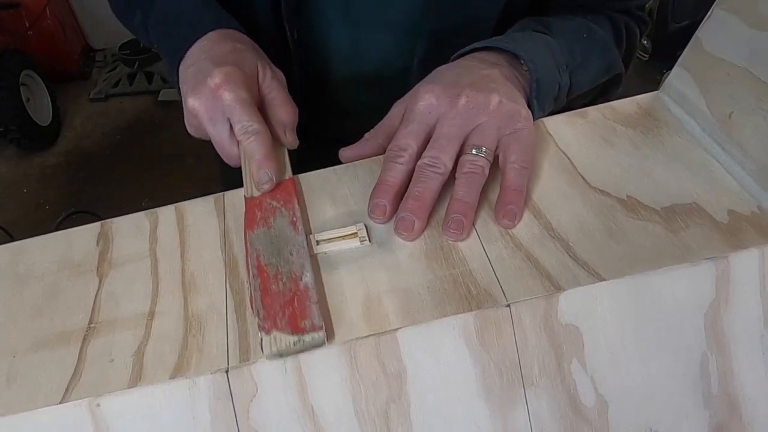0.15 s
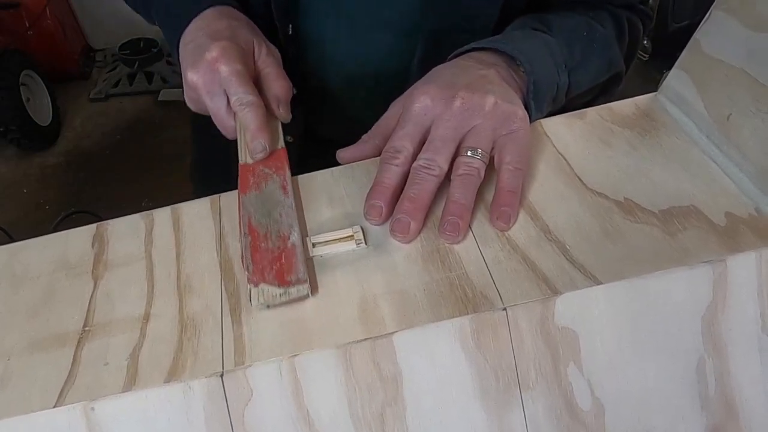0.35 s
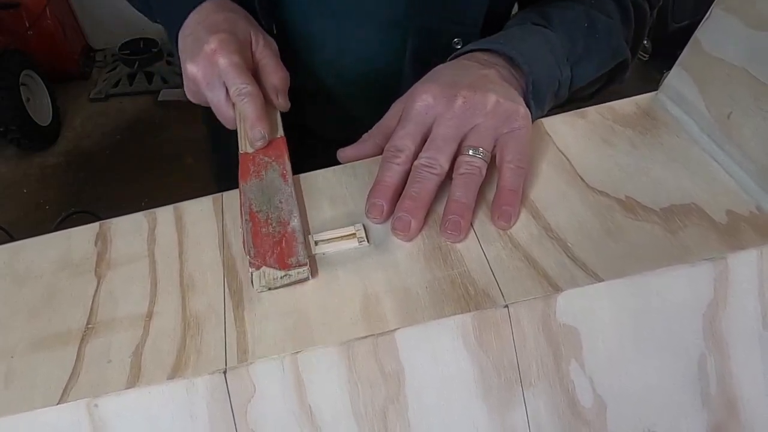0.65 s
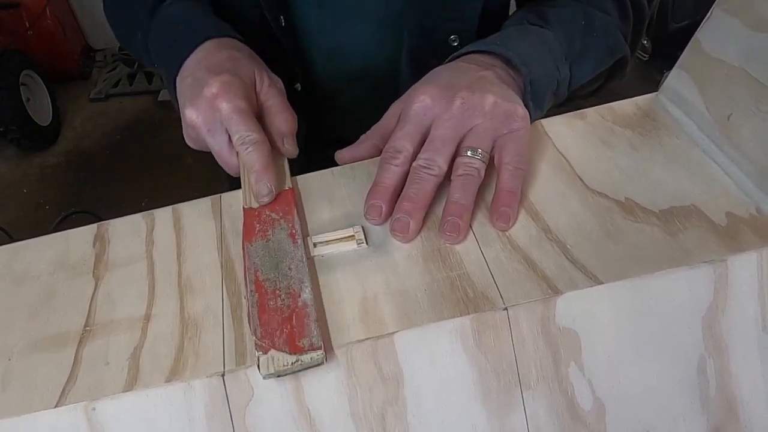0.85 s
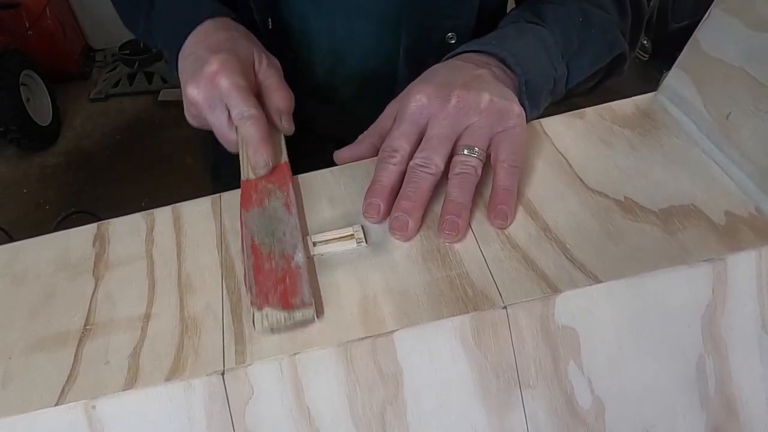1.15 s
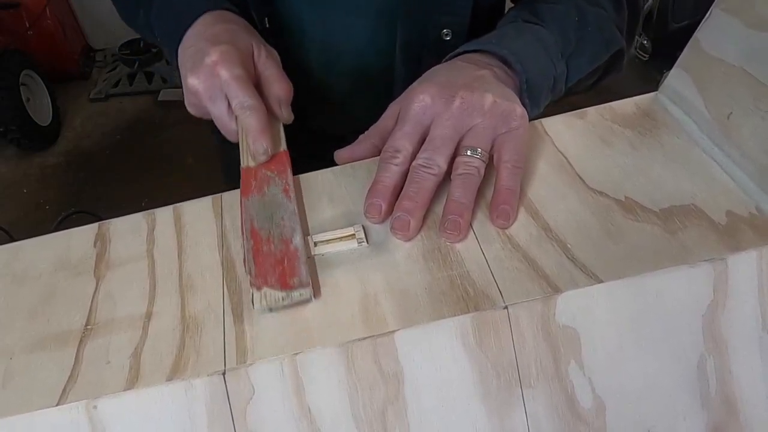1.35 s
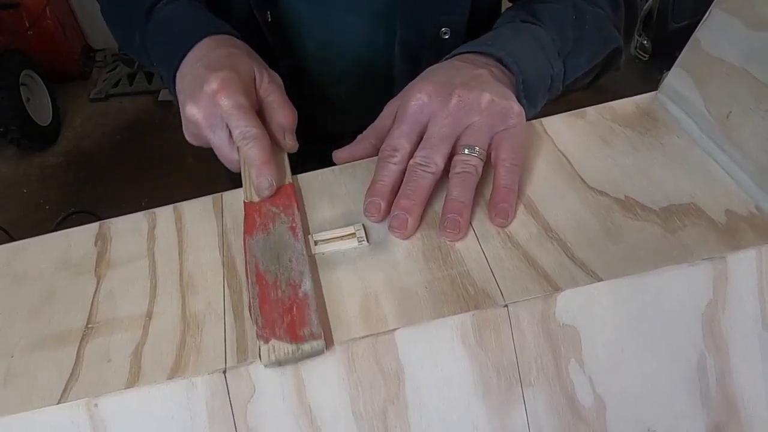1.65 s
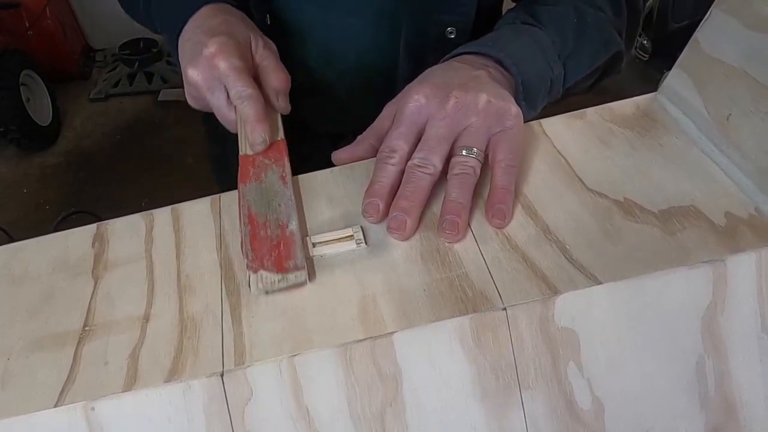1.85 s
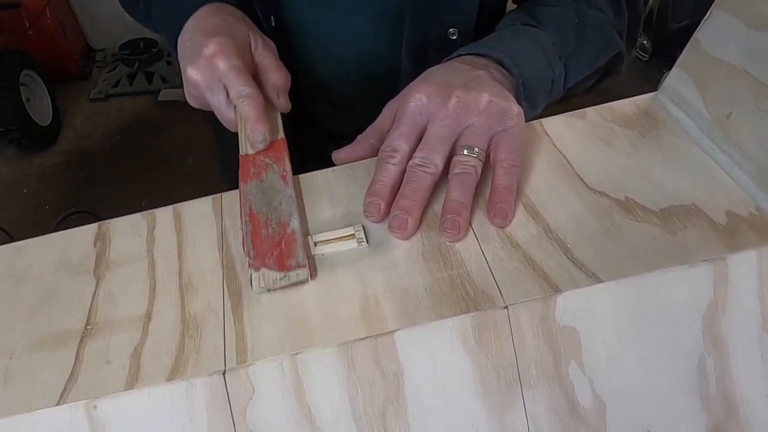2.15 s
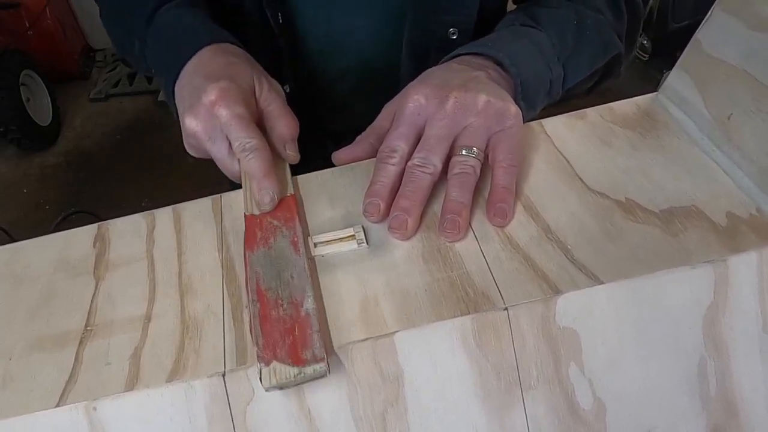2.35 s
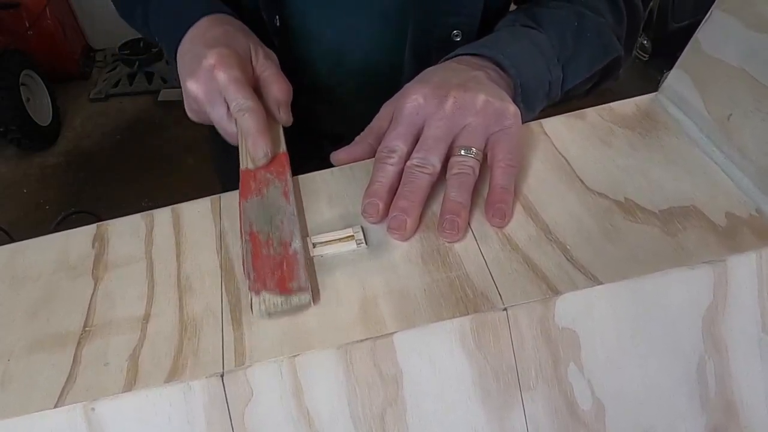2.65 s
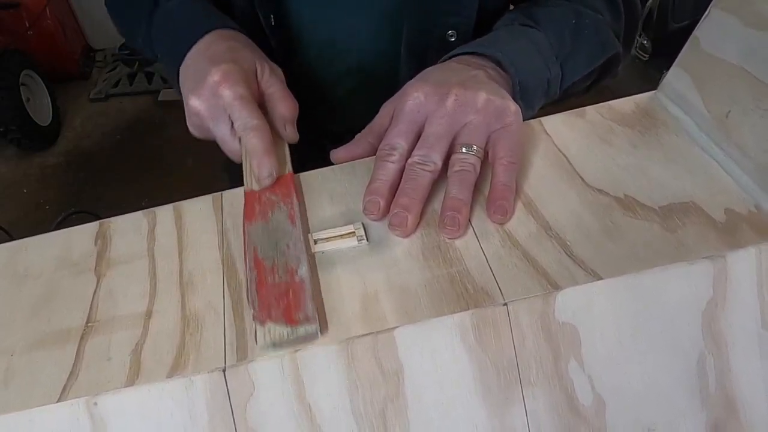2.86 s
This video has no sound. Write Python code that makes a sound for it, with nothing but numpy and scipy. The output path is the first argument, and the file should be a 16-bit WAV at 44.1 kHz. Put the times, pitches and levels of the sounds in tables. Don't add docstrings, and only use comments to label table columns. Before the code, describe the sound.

Sanding block rasps back and forth over wood in quick even strokes, bench softly knocking beneath

```python
import sys
import numpy as np
from scipy import signal
from scipy.fft import rfft, irfft, next_fast_len
from scipy.io import wavfile
from scipy.ndimage import uniform_filter1d, map_coordinates

SR = 44100
rng = np.random.default_rng(int(sys.argv[2]) if len(sys.argv) > 2 else 0)


def to_linear_factor(level_db):
    exponent = np.asarray(level_db, float) / 20
    return 10 ** exponent


def generate_wav(sig):
    pcm = np.round(np.clip(np.atleast_2d(sig).T, -1, 1) * 32767).astype(np.int16)
    wavfile.write(sys.argv[1], SR, pcm)


N = 132300


def unit(x):
    return x / np.sqrt(np.mean(x ** 2) + 1e-20)


def along(points, hz):
    f, v = np.transpose(points)
    return np.interp(np.log(hz + 1), np.log(f + 1), v)


def wobble(rate):
    knots = rng.standard_normal(int(N * rate / SR) + 4)
    return map_coordinates(knots, [np.arange(N) * rate / SR])


def filtered(x, response):
    m = next_fast_len(N + SR // 2)
    return irfft(rfft(x, m) * response(np.fft.rfftfreq(m, 1 / SR)), m)[..., :N]


def noise(response):
    return unit(filtered(rng.standard_normal(N), response))


def peak(f, c, w):
    return 1j * f * w / (c * c - f * f + 1j * f * w)


def struck(blows, response):
    return filtered(blows, response) / np.abs(filtered(np.arange(N) == 0, response)).max()


def swells(rows):
    t = np.arange(N) / SR
    out = np.zeros(N)
    for s, hz, db, half in rows:
        phase = rng.random()
        out += to_linear_factor(db - 8.7 * ((t - s) / half) ** 2) * np.sin(2 * np.pi * (hz * t + phase))
    return out


# (start [s], level [dB], fine grit [dB], lateness of top speed [power], pause [share of stroke])
STROKES = [(-0.1, -36.5, -12, 0.016, 0.09), (0.1, -33.5, -12, 0.02, 0.03), (0.302, -36, -16, 0.011, 0.093),
           (0.505, -33, -9.5, 0.15, 0.065), (0.687, -34.5, -14.5, 0.0099, 0.026),
           (0.873, -33.5, -11.5, 0.02, 0.044), (1.064, -35.5, -14, 0.025, 0.046),
           (1.258, -34, -9.5, 0.06, 0.039), (1.442, -36.5, -13, 0.016, 0.041),
           (1.631, -34, -10, 0.02, 0.079), (1.82, -35, -13.5, 0.074, 0.03), (2.006, -34, -9, 0.013, 0.035),
           (2.201, -34.5, -11, 0.024, 0.1), (2.405, -34, -8.5, 0.0053, 0.027),
           (2.59, -33.5, -14.5, 0.02, 0.088), (2.785, -32, -10.5, 0.043, 0.064)]


def stroke_motion():
    last_turn_s = 2.98
    start, level_db, grit_db, late, pause = np.transpose(STROKES)
    turns = np.append(start, [last_turn_s, 2 * last_turn_s - start[-1]])
    at = np.interp(np.arange(N) / SR, turns, np.arange(len(turns)))
    k = np.minimum(at.astype(int), len(start) - 1)
    push = at.astype(int) % 2 == 1
    u = np.clip((at % 1 - pause[k]) / (1 - 2 * pause[k]), 0, 1)
    return push, u, level_db[k], grit_db[k], late[k]


def scratches(patchy_db):
    per_second, spike_db = 30000, 0.28
    hits = rng.random(N) < per_second / SR
    x = hits * rng.standard_normal(N) * to_linear_factor(spike_db * rng.exponential(size=N))
    z = signal.stft(x, nperseg=512)[2]
    field = uniform_filter1d(rng.standard_normal(z.shape), size=4, axis=0)
    field = uniform_filter1d(field, size=6, axis=1)
    return signal.istft(z * to_linear_factor(patchy_db * unit(field)), nperseg=512)[1][:N]


# (frequency [Hz], level [dB per Hz])
PUSH_COLOUR = [(210, -9), (350, -7), (608, -3.5), (733, -5), (907, -4.5), (1460, 0), (1660, -4.5),
               (3740, -2), (7000, -14.5), (9100, -18.5), (15400, -120)]
PULL_COLOUR = [(210, -53), (350, -13.5), (536, 1.5), (608, -29.5), (655, -5.5), (1100, -4.5), (1810, -7.5),
               (4240, -6.5), (7000, -22), (9100, -24.5), (15400, -120)]
# (frequency [Hz], width [Hz], push lift [dB], pull lift [dB])
WOOD_MODES = [(492, 88, 5.5, -16), (720, 21, 10.5, 3), (835, 10.4, 11.5, -70), (1057, 100, 2.5, -27),
              (1440, 133, 1.5, 5), (1835, 122, 7, 8.5), (2158, 75, 7, 4), (2797, 120, -0.5, 4),
              (3065, 210, 1.5, 0), (3800, 270, 1.5, -1)]


def wood_rub(colour, lift):
    def response(f):
        ring = sum(np.abs(to_linear_factor(mode[lift]) * peak(f, mode[0], mode[1])) ** 2 for mode in WOOD_MODES)
        return to_linear_factor(along(colour, f)) * np.sqrt(1 + ring)
    return unit(filtered(scratches(patchy_db=1.5), response))


# (frequency [Hz], level [dB per Hz])
GRIT_COLOUR = [(3200, -13), (5500, -0.5), (7400, -4.5), (9800, -12), (12000, -19), (14000, -24),
               (15000, -25), (15900, -30)]


def fine_grit():
    return unit(filtered(scratches(patchy_db=2.2), lambda f: to_linear_factor(along(GRIT_COLOUR, f))))


# (frequency [Hz], level [dB per Hz])
FIZZ_COLOUR = [(6000, -30), (10000, -4), (13000, 0), (15900, 3)]


def fizz(push, u):
    at, half_length = 0.2, 0.1
    fizz_db = np.where(push, -34, -28) - 8.7 * ((u - at) / half_length) ** 2
    return to_linear_factor(fizz_db) * noise(lambda f: to_linear_factor(along(FIZZ_COLOUR, f)))


def sanding():
    push, u, level_db, grit_db, late = stroke_motion()
    bite = np.where(push, 1.14, 0.63)

    def speed(push_skew, pull_skew):
        skewed = u ** (np.where(push, push_skew, pull_skew) + late)
        return np.tanh(bite * np.abs(np.sin(np.pi * skewed))) / np.tanh(bite)

    body = speed(1.055, 0.82) ** np.where(push, 1.39, 1.11)
    grit = speed(0.96, 0.63) ** np.where(push, 2.35, 1.53)
    rub = np.where(push, wood_rub(PUSH_COLOUR, 2), wood_rub(PULL_COLOUR, 3))
    body_db, fine_db = 4.5, 7.5
    drag_db = level_db + 0.43 * wobble(25.48)
    layers = to_linear_factor(body_db) * body * rub + to_linear_factor(grit_db + fine_db) * grit * fine_grit()
    return to_linear_factor(drag_db) * (layers + fizz(push, u))


# (time [s], frequency [Hz], level [dB])
SINGS = [(0.01, 1983, -37.5), (.57, 2100, -37), (1.14, 1403, -34.5), (1.2, 3800, -37), (1.53, 1835, -39),
         (1.54, 2710, -40), (2.13, 2790, -35), (1.17, 2160, -40), (.6, 1484, -37.5), (.68, 994, -38),
         (2.16, 1200, -41), (2.27, 1835, -37.5), (2.31, 1850, -39), (2.5, 2780, -39), (2.32, 4390, -39.5),
         (2.66, 1835, -39), (2.7, 2870, -38), (2.7, 1800, -40), (2.73, 3990, -35.5), (2.88, 3800, -39)]


def singing():
    half_length_s, q = 0.024, 18.5
    t, grit = np.arange(N) / SR, rng.standard_normal(N)
    out = np.zeros(N)
    for s, hz, db in SINGS:
        ring = unit(filtered(grit, lambda f: peak(f, hz, hz / q) ** 2))
        out += to_linear_factor(db) * np.exp(-((t - s) / half_length_s) ** 2) * ring
    return out


# (frequency [Hz], level [dB per Hz])
AIR_COLOUR = [(100, -18), (160, -0.5), (270, -2), (450, -12.5), (1000, -11.5), (4000, -21.5), (9000, -39),
              (15000, -79)]


def quiet_air():
    hiss = filtered(rng.standard_normal((2, N)), lambda f: to_linear_factor(along(AIR_COLOUR, f)))
    return to_linear_factor(-38.5 + 0.5 * np.arange(N) / SR) * unit(hiss)


# (frequency [Hz], width [Hz], level [dB])
BENCH_MODES = [(66, 49, -23), (161, 17, -11), (202, 28, -3), (229, 13, -1.5), (284, 22, -2),
               (364, 46, -12.5), (413, 14, -11.5)]


def softened(f):
    knock_hz, stand_hz = 304, 111
    return (1 + 1j * f / knock_hz) ** -4 * 1j * f / (stand_hz + 1j * f)


def bench_top(f):
    return sum(to_linear_factor(db) * peak(f, c, w) for c, w, db in BENCH_MODES) * softened(f)


def bench_main(f):
    return peak(f, 139.1, 10.3) * softened(f)


# (time [s], peak level [dB], ring of the main mode [dB])
KNOCKS = [(0.505, -25, -2), (0.673, -21, -19), (0.767, -28.5, -1.5), (0.808, -33, -13), (0.888, -22, -6),
          (.94, -28, -8), (1.059, -37, 4), (1.143, -25, -2), (1.27, -19.5, -2.5), (1.31, -27, -1),
          (1.533, -32.5, 5.5), (1.65, -18.5, -2.5), (1.689, -25, 3), (1.911, -22, 0), (2.027, -18, -4.5),
          (2.069, -27, -3), (2.135, -42, -7), (2.237, -27, -0.5), (2.293, -21, -20), (2.413, -12, -6),
          (2.459, -22.5, -0.5), (2.531, -17.5, -2), (2.687, -24, 1.5), (2.808, -12.5, -7.5),
          (2.829, -18.5, -7), (2.841, -27, -14), (2.851, -19, -9), (2.924, -17, -1)]


def knock_blows():
    rise_s = 0.0054
    s, knock_db, ring_db = np.transpose(KNOCKS)
    at = ((s + rise_s) * SR).astype(int)
    return [np.bincount(at, -to_linear_factor(db), N) for db in (knock_db, knock_db + ring_db)]


# (time [s], level [dB])
SHAKE = [
    (0.0, -45.5),
    (0.17, -40.5),
    (0.38, -40.5),
    (0.49, -33.5),
    (0.74, -38.5),
    (0.84, -37),
    (1.46, -35),
    (1.78, -34),
    (3.0, -27.5),
]
# (frequency [Hz], level [dB per Hz])
SWAY_COLOUR = [(10, -6), (25, 0), (40, -7), (65, -0.5), (100, -7.5), (130, -13), (250, -66)]


def shaking(blows):
    rattle_t60_s, rattle_rise_hz = 0.22, 60
    shake_db = np.interp(np.arange(N) / SR, *np.transpose(SHAKE))
    hum = noise(lambda f: bench_top(f) + bench_main(f))

    def chatter(f):
        decay = SR / (np.log(1000) / rattle_t60_s + 2j * np.pi * f)
        return decay / (1 + 1j * f / rattle_rise_hz) ** 2

    still = to_linear_factor(shake_db - 8 + 2.4 * wobble(8.2))
    rattle = to_linear_factor(-20.5) * filtered(-blows, chatter)
    sway = noise(lambda f: to_linear_factor(along(SWAY_COLOUR, f))) * to_linear_factor(-5.5 + 5.5 * wobble(3.7))
    return hum * (still + rattle) + to_linear_factor(shake_db) * sway


# (time [s], frequency [Hz], level [dB], half length [s])
HUMS = [(.05, 455, -40, 0.037), (.055, 275, -38, 0.1), (.19, 230, -35.5, 0.014), (.215, 493, -44, 0.016),
        (.459, 280, -39, .04), (.534, 425, -39.5, 0.022), (.634, 490, -38, .025), (.683, 406, -35.5, .02),
        (.693, 299, -41, .03), (.778, 304, -42.5, 0.02), (.85, 690, -45, 0.023), (1.2, 140, -34, .05),
        (1.44, 140, -32.5, 0.063), (1.12, 140, -35, 0.027), (1.19, 227.4, -46, 0.026),
        (1.58, 140.1, -33.5, 0.038), (1.69, 144, -29, 0.028), (1.886, 673, -39.5, 0.027),
        (1.94, 143.4, -36, 0.024), (2.2, 150, -36, .025), (2.57, 137.8, -33, 0.026), (2.72, 140, -35, .04),
        (.73, 188, -38, 0.02), (2.25, 280, -35, 0.028), (2.265, 600, -36, 0.014), (2.454, 441, -41, 0.015),
        (2.59, 200, -41, 0.023), (2.845, 398, -31, 0.027), (2.96, 135, -35, 0.016)]


def board_hums():
    return swells(HUMS)


# (time [s], peak level [dB])
TICKS = [
    (.2123, -18),
    (.7379, -22),
    (1.3387, -17),
    (1.507, -18),
    (1.5384, -18),
    (1.886, -32),
    (1.9612, -21),
    (2.1084, -18),
    (2.4982, -23),
    (2.871, -32),
]


def ticks():
    s, tick_db = np.transpose(TICKS)
    blows = np.bincount((s * SR).astype(int), to_linear_factor(tick_db), N)
    return struck(blows, lambda f: peak(f, 2460, 2200) ** 2)


# (time [s], frequency [Hz], level [dB])
LURCHES = [(.37, 68, -36.5), (.559, 76, -32.5), (.68, 42, -38), (.823, 46, -30.5), (.933, 71, -35),
           (.938, 27, -29), (1.058, 20, -33), (1.22, 55, -37), (1.327, 22, -26), (1.397, 74, -32),
           (1.462, 31, -27), (1.586, 76, -41), (1.59, 21, -34), (1.711, 73, -37), (1.716, 22, -30),
           (1.831, 25, -24), (2.06, 67, -31), (2.09, 24, -27), (2.205, 23.2, -30), (2.38, 19, -35),
           (2.474, 24, -27), (2.594, 25, -24.5), (2.629, 79, -35), (2.729, 38, -26), (2.854, 67, -35),
           (2.868, 29, -36), (2.978, 17, -25)]


def stand_lurches():
    half_length_s = 0.031
    return swells([(*row, half_length_s) for row in LURCHES])


def bench():
    top_blows, main_blows = knock_blows()
    knocks = struck(top_blows, bench_top) + struck(main_blows, bench_main)
    return shaking(top_blows) + board_hums() + stand_lurches() + to_linear_factor(-1.5) * knocks


def tock():
    start_s, hz, level_db, t60_s, rise_s = 2.64, 505, -22, 0.05, 0.00049
    t = np.maximum(np.arange(N) / SR - start_s, 0)
    return to_linear_factor(level_db - 60 * t / t60_s) * np.sin(2 * np.pi * hz * t) * (1 - np.exp(-t / rise_s))


# (frequency [Hz], t60 [s])
SHOP_T60 = [(150, 1), (1000, 0.92), (4000, 0.33), (12000, 0.2)]


def shop(x):
    hz, t, z = signal.stft(rng.standard_normal((2, SR // 2)), SR, nperseg=256)
    tail = signal.istft(z * to_linear_factor(-60 * t / along(SHOP_T60, hz)[:, None]), SR, nperseg=256)[1]
    tail = tail / np.linalg.norm(tail[0])
    late = np.pad(x, (300, 0))[None]
    return signal.fftconvolve(late, tail, axes=1)[:, :N]


# (frequency [Hz], likeness [share])
SHOP_ALIKE = [(300, 0.69), (1000, 0.78), (3000, 0.26), (12000, .05)]


def shop_stereo(x):
    left, right = shop(x)
    apart = filtered(left - right, lambda f: np.sqrt(1 - np.clip(along(SHOP_ALIKE, f), 0, 1)))
    return (left + right + np.array([apart, -apart])) / 2


# (frequency [Hz], left-right likeness [share])
ALIKE = [(30, 1), (70, 1), (125, 1), (290, 1), (640, 0.98), (1410, 0.84), (2400, 0.8), (4000, 0.75),
         (8000, 0.94), (11000, 0.66), (15000, .35)]
# (frequency [Hz], left over right [dB])
LEAN = [(30, .9), (110, .1), (400, .4), (1300, 1.3), (2400, 2.2), (4400, 1.6), (8100, -.3), (15000, -7)]
# (frequency [Hz], left lead [radians])
LEAD = [(300, 0.006), (1000, -0.27), (2000, 0.33), (6000, -0.92), (15000, -0.83)]


def ports(x, other):
    def blend(f):
        angle = np.arccos(np.clip(along(ALIKE, f), -1, 1)) / 2
        return np.array([np.cos(angle), np.sin(angle)])

    mid, side = filtered(np.array([x, other]), blend)
    sign = np.array([[1], [-1]])

    def colour(f):
        return to_linear_factor(sign * along(LEAN, f) / 2) * np.exp(0.5j * sign * along(LEAD, f))

    return filtered(mid + sign * side, colour)


def scene():
    rub = sanding() + singing() + ticks()
    low = bench() + tock()
    air = quiet_air()
    other_face = sanding() + np.roll(low, SR // 40)
    near = ports(rub + low + air[0], other_face + air[1])
    return near + to_linear_factor(-10) * shop_stereo(rub) + to_linear_factor(-30) * shop(low).mean(axis=0)


def low_pass(x):
    return signal.sosfilt(signal.butter(12, 15740, fs=SR, output="sos"), x)


# (frequency [Hz], level [dB])
MIC_TREBLE = [(13500, 0), (14500, -4), (15300, -11), (16000, -25)]


def record(dry):
    mix = filtered(dry, lambda f: to_linear_factor(along(MIC_TREBLE, f)))
    return low_pass(mix)


dry = scene()
out = record(dry)
generate_wav(out)
```